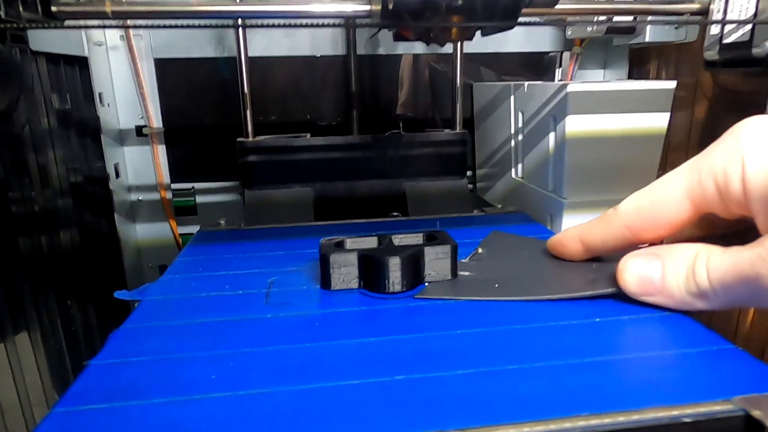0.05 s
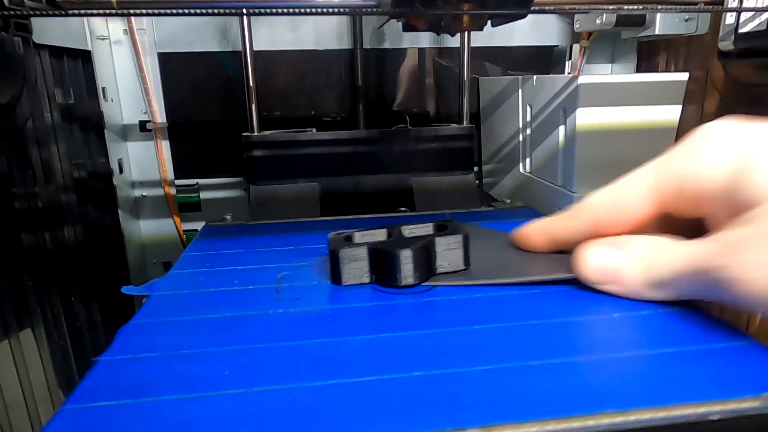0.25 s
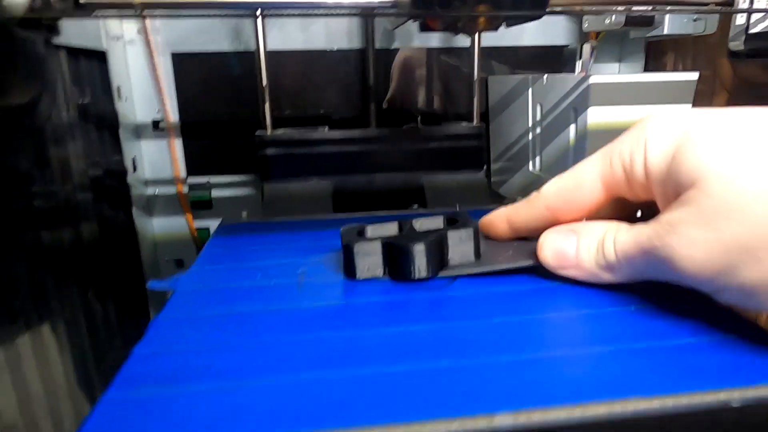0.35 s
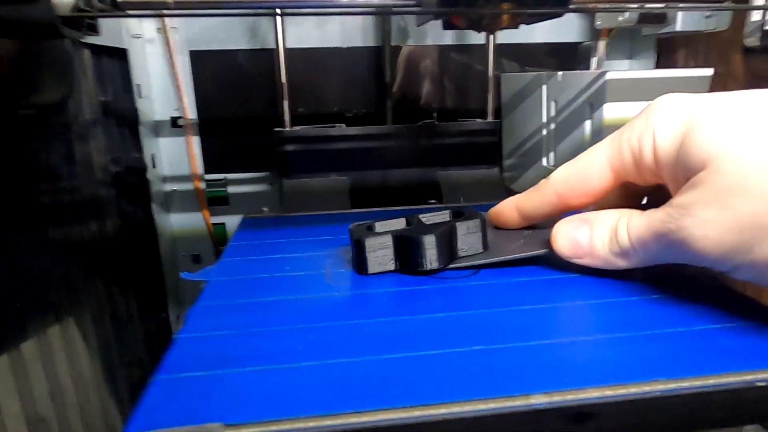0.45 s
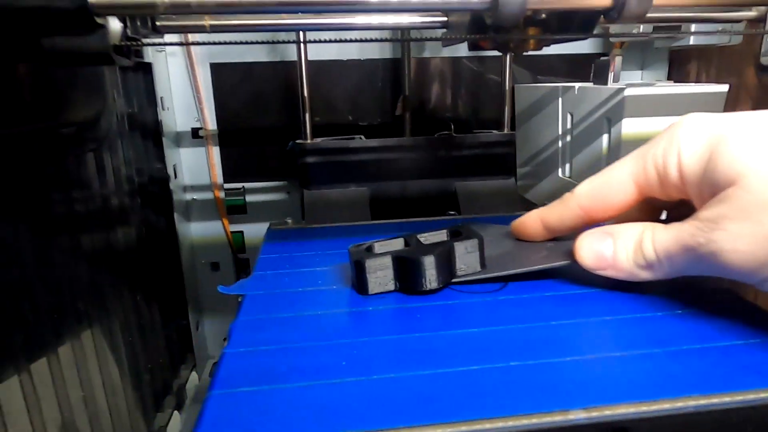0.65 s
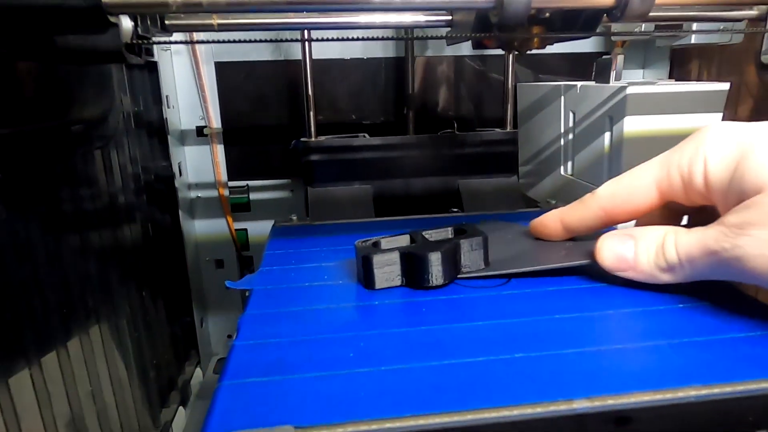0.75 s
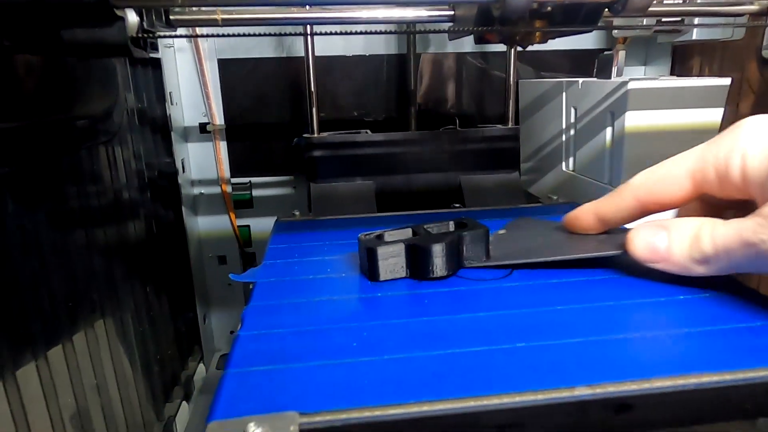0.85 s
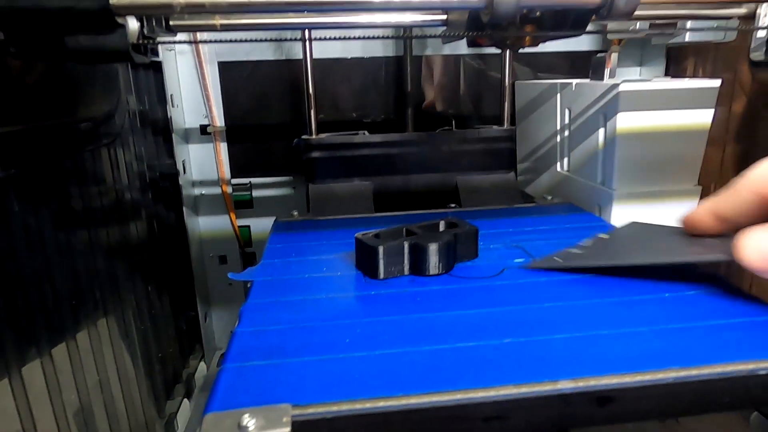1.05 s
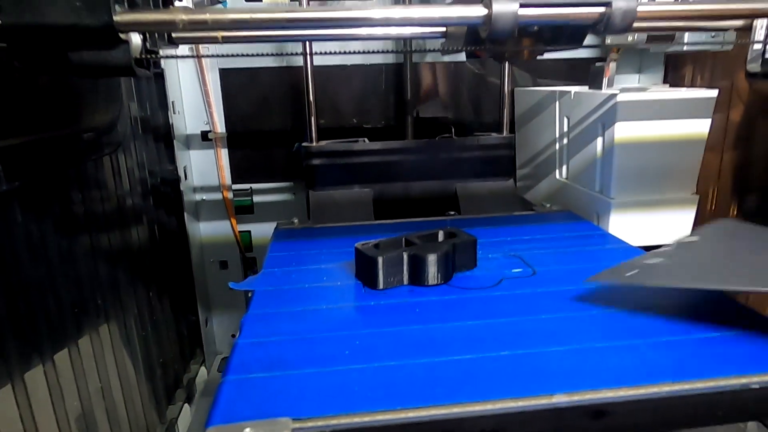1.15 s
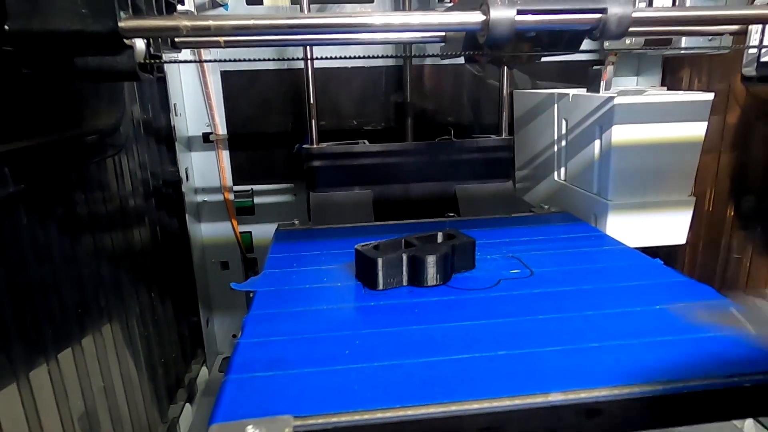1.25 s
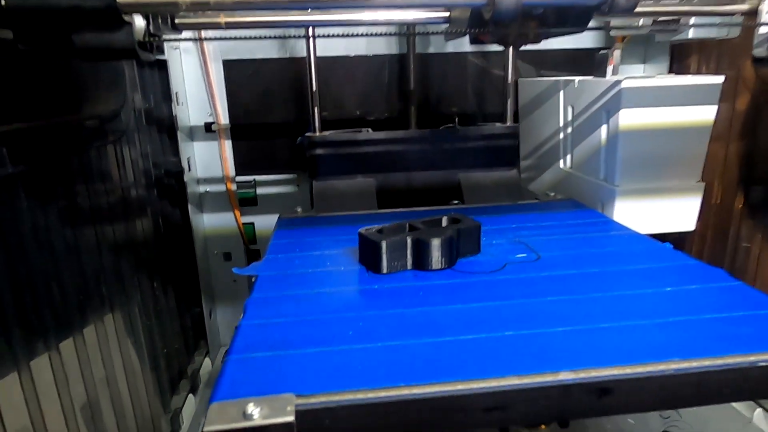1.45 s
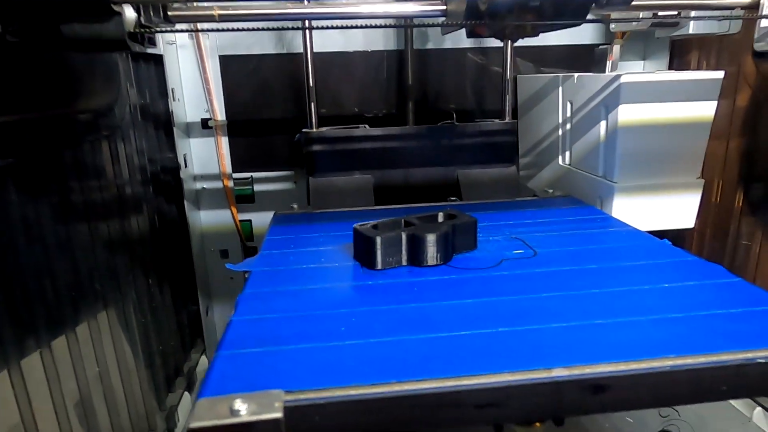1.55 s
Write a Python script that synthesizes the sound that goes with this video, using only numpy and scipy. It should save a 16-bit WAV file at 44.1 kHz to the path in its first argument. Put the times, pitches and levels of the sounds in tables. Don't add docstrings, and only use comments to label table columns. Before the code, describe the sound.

Gritty scraping of a steel blade, a sharp snap and low thud, then softer scraping away

```python
import sys
import numpy as np
from scipy import signal
from scipy.fft import rfft, irfft
from scipy.io import wavfile
from scipy.ndimage import uniform_filter1d

SR = 44100
rng = np.random.default_rng(int(sys.argv[2]) if len(sys.argv) > 2 else 0)


def amplitude_ratio(level_db):
    exponent = np.asarray(level_db, float) / 20
    return 10 ** exponent


def master(y):
    cut = np.clip(np.atleast_2d(y).T, -1, 1)
    pcm = np.round(cut * 32767)
    wavfile.write(sys.argv[1], SR, pcm.astype(np.int16))


N = 70560

# time in seconds, friction level in dB, brightness in dB per octave.
STROKES = [
    [(0, -46, 1), (.012, -47, -1.5), (.04, -61.5, 0), (.06, -43.5, 0), (.105, -38, 2.5), (.125, -49.5, 0.5),
     (.25, -45, 2.5), (.275, -50.5, 1.5), (.325, -45, 3.5)],
    [(.325, -43, 0.5), (.347, -28.5, 5.5), (.365, -26.5, -1), (.39, -30.5, -4.5), (.425, -34, -5),
     (.45, -31, -2), (.465, -32, -4.5), (.487, -32.5, -5), (.52, -61.5, -11)],
    [(.52, -54, -4), (.585, -52.5, -4), (.61, -64, 7.5), (.67, -55.5, -2), (.7, -52, -3),
     (.76, -47.5, -2.5), (.79, -57, -0.5), (.88, -60.5, 0)],
    [(.88, -59, -8.5), (.96, -46, -5), (.985, -39, -3.5), (1.02, -42.5, -1), (1.055, -52.5, -2),
     (1.085, -49, 0.5), (1.17, -56, -1.5), (1.235, -48, 1.5), (1.27, -82, -7)],
]
# clicks per second, size spread in dB, ringing share in dB.
GRIT = [(4860, -1, 0.5), (3500, 4.5, -9.5), (4590, 2, -15), (4000, 2.5, -31)]


def read(points, hz):
    f, value = np.transpose(points)
    return np.interp(np.log(hz + 1), np.log(f + 1), value)


def evened(x):
    return x / np.sqrt(np.mean(x ** 2) + 1e-20)


def add(mix, s, sound):
    part = mix[max(round(s * SR), 0):][:len(sound)]
    part += sound[:len(part)]


def ring(x, hz, width):
    return signal.lfilter(*signal.iirpeak(hz, hz / max(width, 3), SR), x)


def coloured(x, points):
    hz = np.abs(np.fft.fftfreq(4096, 1 / SR))
    log_gain = np.log(amplitude_ratio(np.maximum(read(points, hz), -100)))
    taps = np.fft.ifft(np.exp(np.conj(signal.hilbert(log_gain)))).real[:2048]
    return signal.oaconvolve(x, taps)[:len(x)]


def tilted(x, tilt_db):
    hz, t, z = signal.stft(x, SR, nperseg=128)
    slope = np.interp(t * SR, np.arange(len(x)), tilt_db * np.ones(len(x)))
    octaves = np.log2(np.clip(hz, 400, None) / 3500)
    z = z * amplitude_ratio(octaves[:, None] * slope)
    return signal.istft(z, SR, nperseg=128)[1][:len(x)]


def body(colour, peaks, ring_db):
    pulse = 1. * (np.arange(3000) == 0)
    rung = sum(amplitude_ratio(db) * ring(pulse, hz, 0.89 * width) / np.sqrt(width) for hz, width, db in peaks)
    both = evened(coloured(pulse, colour)) + amplitude_ratio(ring_db) * evened(rung)
    return both / np.linalg.norm(both)


def stroke_bodies():
    # frequency in Hz, density in dB per Hz.
    push, pry, settle, pull = [(290, -51), (1130, -10), (1500, -2.5), (3280, -6), (6800, -16), (8000, -23),
                               (9500, -13), (15500, -33.5)], [(120, -31), (200, -10.5), (630, -17), (677, -12),
                                             (1880, -11.5), (4840, -9.5), (15500, -33.5)], [(350, -11.5), (600, -4.5), (950, -2.5),
                                                          (1900, -5), (3480, 0), (6000, -14), (15500, -42)], [(350, -56), (600, -19),
                                                                          (1390, -6), (1880, -7.5),
                                                                          (3920, 2), (15500, -27.5)]
    # frequency in Hz, width in Hz, level in dB.
    push_ring, pry_ring = [(1460, 100, -10.5), (1690, 54, -4.5), (3220, 200, -2), (3550, 290, -4.5),
                           (4400, 140, -25), (6040, 230, -8.5), (6300, 210, -10), (9600, 290, -18)], [(3240, 140, -3), (3820, 120, 0), (4560, 67, -21),
                                              (6960, 46, -25), (8570, 63, -15)]
    settle_ring, pull_ring = [(2730, 110, 0.7), (4400, 90, 0)], [(3250, 200, 0.37), (4300, 190, 0.64)]
    colours = push, pry, settle, pull
    rings = push_ring, pry_ring, settle_ring, pull_ring
    return [body(colour, peaks, grit[2]) for colour, peaks, grit in zip(colours, rings, GRIT)]


def stroke(rows, taps, grit):
    s, level_db, tilt_db = np.transpose(rows)
    t = np.arange(s[0], s[-1] + 0.0087, 1 / SR)
    clicks_per_s, spread_db = grit[:2]
    hit = rng.random(SR // 2) < clicks_per_s / SR
    size = amplitude_ratio(spread_db * np.minimum(rng.exponential(1, SR // 2), 3))
    sign, hiss = rng.choice([-1., 1.], SR // 2), rng.standard_normal(SR // 2)
    drive = evened(evened(hit * size * sign) + 0.44 * hiss)[:len(t)]
    fade = np.clip(np.minimum(t - t[0], t[-1] - t) / 0.0091, 0, 1)
    sound = signal.oaconvolve(drive * amplitude_ratio(np.interp(t, s, level_db)) * fade, taps)
    return s[0], tilted(sound, np.interp(s[0] + np.arange(len(sound)) / SR, s, tilt_db))


def tick(s, peak_db, tilt_db, decay, taps):
    t, decay = np.arange(2000) / SR, max(decay, 3e-4)
    crack = 4 * max(1 - decay / .004, 0) * np.exp(-t / .0004)
    envelope = np.minimum(t / (0.18 * decay), 1) * (np.exp(-t / decay) + crack)
    x = tilted(signal.oaconvolve(rng.standard_normal(2000) * envelope, taps), tilt_db)
    return s, amplitude_ratio(peak_db - 4.5) * x / abs(x).max()


def grating(steel):
    # start in seconds, peak in dB, brightness in dB per octave, decay in seconds.
    slips = [(.048, -22.5, -1, 0.0032), (.092, -24, 7.5, 0.007), (0.1444, -20.5, 4, 0.0039),
             (0.1632, -24, 12, 0.0022), (0.2133, -12.5, 4, 0.0012), (0.243, -24, 4.5, 0.0053),
             (0.257, -19.5, 3.5, 0.0024), (.2845, -25.5, 6.5, 0.0043), (0.2954, -23.5, 4.5, 0.0044),
             (0.3291, -21, 2.5, 0.003), (0.3432, -25.5, 1, 0.0045), (0.3577, -1, 15.5, 0.00084),
             (.3637, -9, 4.5, 0.0049), (0.3802, -12, 2.5, 0.0099), (0.443, -18, 10, 0.005),
             (.4548, -12, -0.5, 0.0057), (0.4786, -17, -7, 0.0033), (0.682, -25.5, -2, 0.006),
             (.75, -30, 0, 0.0084), (.817, -35, -0.5, 0.0096), (1.076, -32, 10, 0.0058),
             (1.19, -33, -3, 0.0079)]
    bodies = stroke_bodies()
    for rows, taps, grit in zip(STROKES, bodies, GRIT):
        add(steel, *stroke(rows, taps, grit))
    starts = [rows[0][0] for rows in STROKES[1:]]
    for row in slips:
        add(steel, *tick(*row, bodies[np.searchsorted(starts, row[0])]))


def squeak(s, length, start_hz, end_hz, db):
    t = np.arange(0, length, 1 / SR)
    fuzz = uniform_filter1d(rng.standard_normal((9000, 2)), 200, 0)[:len(t)] @ [1, 1j]
    turns = np.cumsum(end_hz + (start_hz - end_hz) * (1 - t / length) ** 4) / SR
    tone = ((1 + 7 * fuzz) * np.exp(2j * np.pi * turns)).real
    return s, amplitude_ratio(db) * np.sin(np.pi * (t / length) ** .33) * evened(tone)


def singing(steel):
    # start in seconds, length in seconds, start and end pitch in Hz, level in dB.
    squeaks = [(.4545, .021, 3703, 3133, -25), (.455, 0.011, 5260, 4400, -43),
               (0.339, 0.026, 2850, 3310, -40), (0.378, 0.013, 5160, 4720, -24),
               (0.387, .04, 1177, 1313, -33), (0.362, 0.017, 1420, 1340, -29.5),
               (0.464, 0.038, 748, 770, -36), (0.884, 0.056, 950, 910, -51.5),
               (0.929, 0.043, 1317, 1437, -51.5), (0.958, 0.043, 1330, 1104, -50),
               (1.001, 0.045, 1370, 1432, -47), (1.003, 0.043, 1646, 1690, -48),
               (0.936, 0.11, 3600, 3650, -50), (0.981, 0.024, 2910, 3105, -46),
               (1.006, 0.022, 3530, 3300, -55), (1.027, 0.027, 2200, 2150, -48),
               (1.04, 0.06, 2950, 3430, -53), (1.071, 0.019, 4300, 4300, -46),
               (1.08, 0.019, 3880, 3910, -38), (1.078, 0.014, 3200, 3170, -41.5),
               (1.083, 0.046, 2820, 2827, -50), (1.093, 0.04, 4020, 4020, -52),
               (1.136, 0.045, 3920, 4150, -56), (1.182, 0.029, 4000, 3720, -46.5),
               (1.187, 0.037, 2810, 2826, -47), (1.19, 0.016, 5430, 5250, -51.5),
               (1.223, 0.016, 5380, 5350, -54), (1.223, 0.054, 2170, 2000, -57),
               (1.231, 0.024, 1575, 1593, -49.5)]
    # start in seconds, length in seconds, pitch in Hz, level in dB.
    touches = [(.006, 0.013, 1690, -51), (.007, 0.01, 3960, -46), (0.047, .012, 4260, -41.5),
               (0.054, 0.007, 2870, -47), (0.082, 0.015, 1694, -41.5), (0.068, 0.011, 3180, -51),
               (0.084, 0.016, 6280, -42.5), (0.093, 0.019, 9600, -38.5), (0.101, 0.017, 1400, -43),
               (0.103, .012, 6730, -41.5), (0.147, 0.0096, 1430, -40.5), (0.186, 0.057, 417, -44.5),
               (0.188, 0.036, 724, -45.5), (.212, 0.0099, 3326, -30), (.212, 0.0099, 3880, -39),
               (.212, 0.0096, 6455, -36.5), (0.2126, 0.023, 1365, -41), (0.239, .008, 3540, -35),
               (.357, 0.0045, 9720, -20.5), (0.363, .008, 6840, -22.5), (0.363, .008, 3730, -24),
               (0.683, 0.026, 965, -48.5), (0.685, 0.0092, 3540, -42), (0.689, 0.01, 2180, -51),
               (0.737, 0.019, 2280, -53), (.75, 0.048, 2130, -47), (.751, .02, 2725, -47),
               (.75, 0.016, 3390, -44.5), (.75, 0.018, 4710, -48.5), (0.777, 0.018, 1640, -56),
               (.817, 0.038, 807, -48.5), (.819, 0.023, 1645, -52), (.82, 0.016, 2960, -53),
               (0.81, 0.023, 4610, -56.5)]
    for row in squeaks:
        add(steel, *squeak(*row))
    for s, length, hz, db in touches:
        add(steel, *squeak(s, length, hz, hz, db))


def cabinet(x):
    t60, turns_per_s = .036, 7
    t, out = np.arange(4000) / SR, np.zeros((2, N))
    highpass = signal.butter(1, 1800, "high", fs=SR, output="sos")
    for k in range(3):
        echoes = rng.choice([-1., 1.], (2, 4000)) * (rng.random((2, 4000)) < .08)
        taps = signal.sosfilt(highpass, echoes * amplitude_ratio(-60 * t / t60) * (t > .0008))
        taps = taps / np.linalg.norm(taps, axis=1)[:, None]
        share = np.sqrt(2 / 3) * np.cos(np.pi * (turns_per_s * np.arange(N) / SR + k / 3))
        out += signal.fftconvolve((x * share)[None], taps, axes=1)[:, :N]
    return out


def at_ports(steel):
    # frequency in Hz, level difference in dB.
    balance = [(200, .4), (1500, 2), (8000, 2), (13000, -7)]
    lead_s = 2e-5
    hz = np.fft.rfftfreq(N, 1 / SR)
    port = amplitude_ratio(read(balance, hz) / 2) * np.exp(-1j * np.pi * hz * lead_s)
    both = steel + amplitude_ratio(-1.5) * cabinet(steel)
    return irfft(rfft(both) * np.array([port, 1 / port]), N)


def bed():
    # start in seconds, level in dB, pitch in Hz, 60 dB decay in seconds.
    thuds = [(0.194, -18.5, 160.4, 0.063), (0.274, -17, 144.5, 0.12), (0.3, -39, 138, .3),
             (.374, -3.5, 148.7, 0.067), (0.405, -6.5, 62, 0.14), (0.441, -18, 163, 0.079),
             (0.46, -20.5, 41.2, 0.27), (.47, -17, 157.6, 0.11), (0.513, -20.5, 58, 0.16),
             (.52, -20, 148, 0.15), (0.565, -21.5, 141.3, 0.12), (0.654, -26.5, 38.2, 0.32),
             (0.866, -36, 41.8, 0.49), (1.147, -37, 56.5, 0.66), (1.252, -46, 60, 0.25),
             (1.46, -38.5, 176.6, 0.33)]
    # frequency in Hz, width in Hz, level in dB.
    sway_modes = [(58, 14.3, 0), (35.74, 3.8, -3.5), (140.8, 58, -3.5)]
    # time in seconds, shake in dB.
    hand = [(0, -42.5), (.44, -35), (1.3, -45.5), (1.6, -56.5)]
    out, t = np.zeros(N), np.arange(SR // 2) / SR
    rise = (1 - np.exp(-t / 0.0034)) ** 2
    for s, db, hz, t60 in thuds:
        add(out, s, amplitude_ratio(db - 60 * t / t60) * rise * np.sin(2 * np.pi * hz * t))
    sway = np.zeros(N)
    for hz, width, db in sway_modes:
        sway += amplitude_ratio(db) * evened(ring(ring(rng.standard_normal(N), hz, width), hz, width))
    return out + amplitude_ratio(np.interp(np.arange(N) / SR, *np.transpose(hand))) * evened(sway)


def fans():
    # frequency in Hz, density in dB per Hz.
    air_colour = [(18, -20.5), (30, -19), (64, 6.5), (145, -39.5), (170, -7.5), (328, -5.5), (616, -22),
                  (1540, -18.5), (16000, -59.5)]
    # frequency in Hz, likeness (1 the same, 0 or less
    air_same = [(60, 0.78), (240, 0.93), (950, 0.81), (3770, -0.89), (15000, -0.78)]
    # frequency in Hz, level in dB.
    fan_tones = [(318, -55.5), (797, -66), (1589, -66), (2542, -74), (3050, -80), (3935, -76), (10050, -88)]
    hz, t = np.fft.rfftfreq(N, 1 / SR), np.arange(N) / SR
    a, b = rfft(rng.standard_normal((2, N)))
    same = np.clip(read(air_same, hz), 0, 1)
    z = np.array([a, same * a + np.sqrt(1 - same ** 2) * b]) * amplitude_ratio(read(air_colour, hz))
    air = irfft(z, N) / np.std(irfft(z[0] * (hz > 200), N))
    tones = np.zeros(N)
    for f, db in fan_tones:
        waver = 0.55 * evened(ring(rng.standard_normal(N), f, 30.3))
        tones += amplitude_ratio(db) * evened(np.sqrt(2) * np.sin(2 * np.pi * f * t) + waver)
    return amplitude_ratio(-52.5) * air + tones


def scene():
    steel = np.zeros(N)
    grating(steel)
    singing(steel)
    return at_ports(steel) + bed() + fans()


def top_cut(x):
    return signal.sosfilt(signal.butter(12, 16510, fs=SR, output="sos"), x)


def record(dry):
    edge = signal.firwin(255, 15600, window=("kaiser", 4), fs=SR)
    return top_cut(signal.oaconvolve(dry, edge[None], "same"))


dry = scene()
out = record(dry)
master(out)
```